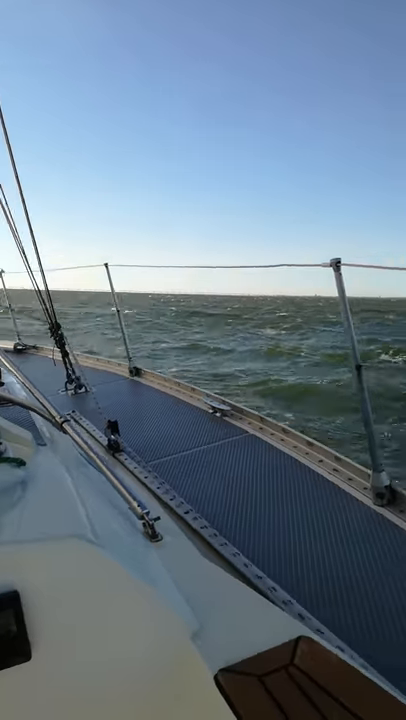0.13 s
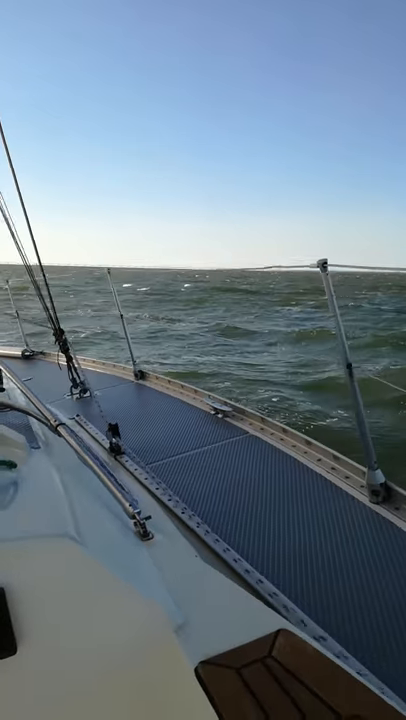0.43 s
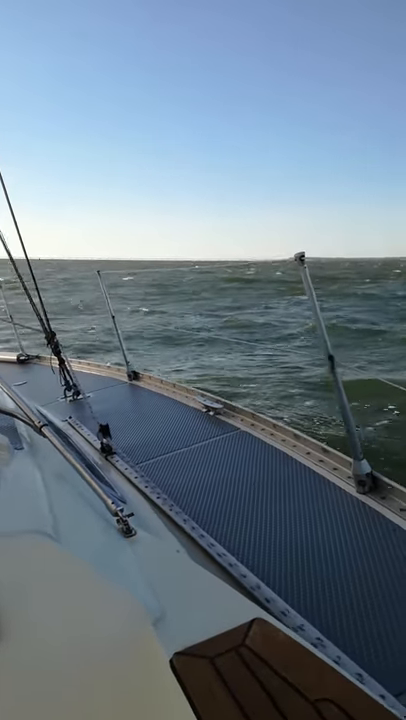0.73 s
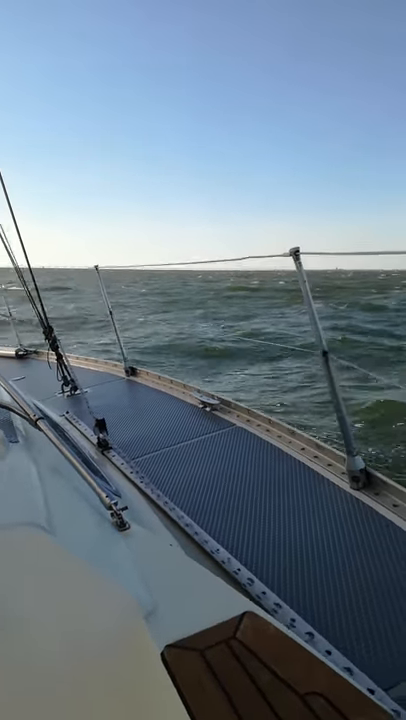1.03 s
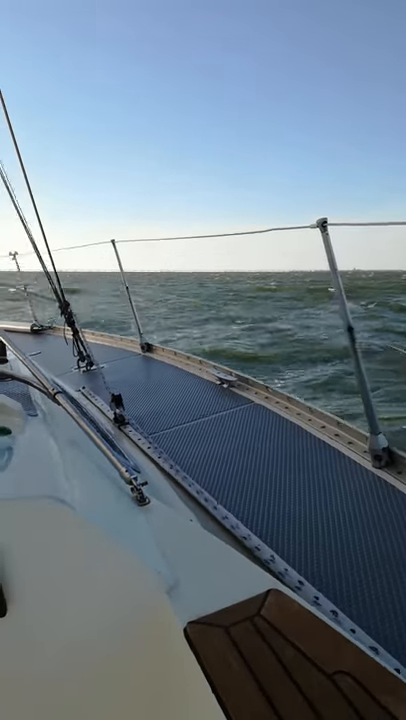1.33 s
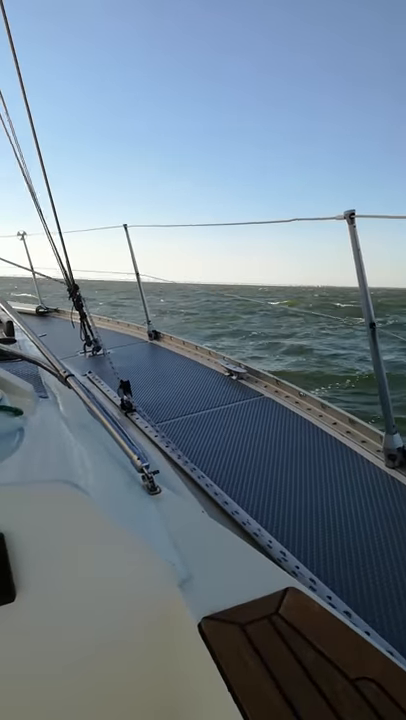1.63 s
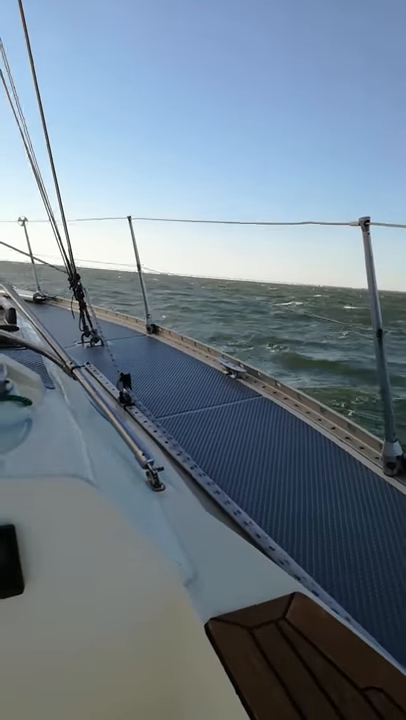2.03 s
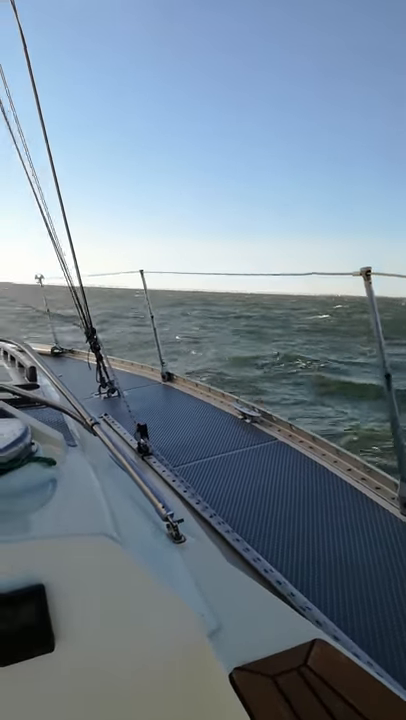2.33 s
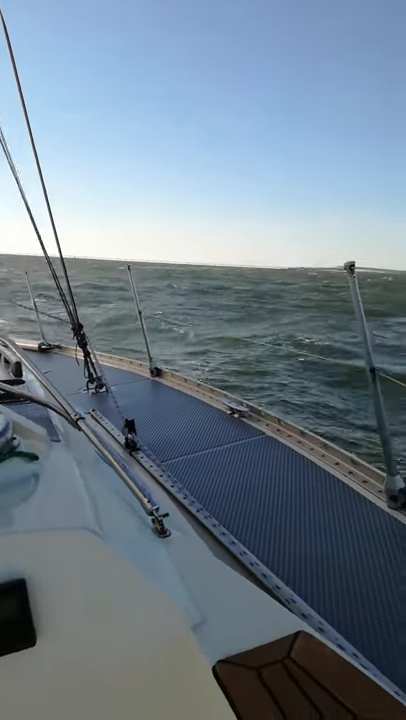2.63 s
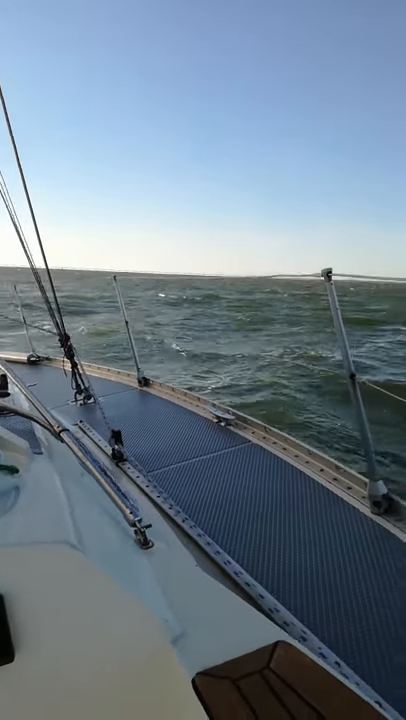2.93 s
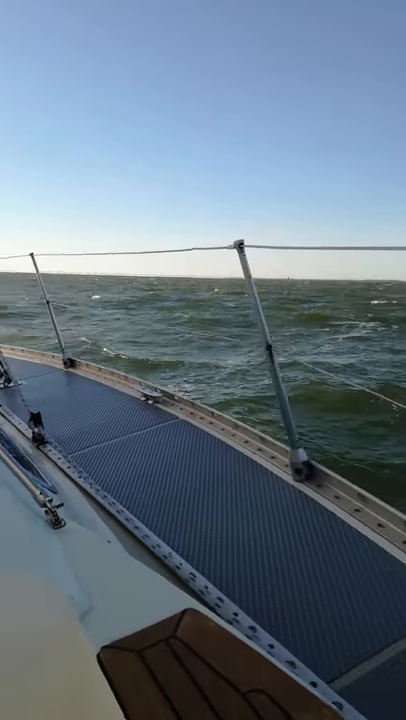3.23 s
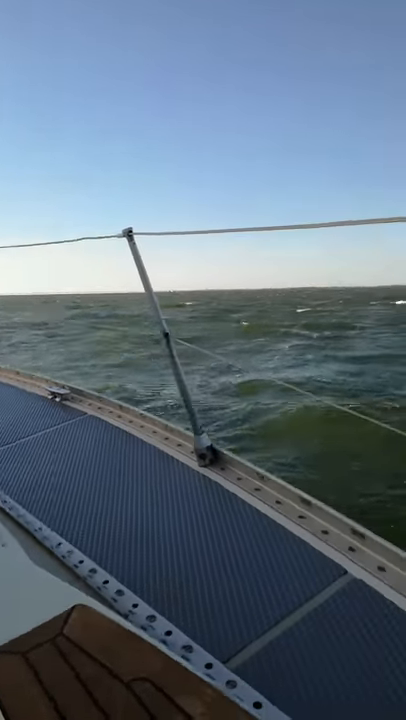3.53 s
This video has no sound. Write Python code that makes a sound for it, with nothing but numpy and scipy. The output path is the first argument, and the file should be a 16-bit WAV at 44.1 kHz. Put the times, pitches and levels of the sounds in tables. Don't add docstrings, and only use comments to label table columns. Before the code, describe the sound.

Fresh wind rumbles and thumps unevenly on a phone's two microphone ports aboard a sailing boat, building toward the end; far quieter, water hisses along the hull and a loose shackle clinks around the middle.

```python
import sys
import numpy as np
from scipy import signal
from scipy.fft import rfft, irfft, next_fast_len
from scipy.io import wavfile
from scipy.ndimage import uniform_filter1d

SR = 44100
rng = np.random.default_rng(int(sys.argv[2]) if len(sys.argv) > 2 else 0)


def persist_wave(psi):
    counts = np.round(np.clip(psi, -1, 1) * 32767).astype(np.int16)
    wavfile.write(sys.argv[1], SR, np.atleast_2d(counts).T)


def makeup_ratio(level_db):
    decades = np.asarray(level_db, float) / 20
    return 10 ** decades


N = 162288

# time of peak in seconds, strength in dB, length in seconds,
# brightness in dB.
LEFT_EDDIES = [(0.006, -30, 0.016, 4.5), (0.064, -27.5, 0.025, -3), (0.162, -22, 0.047, -3),
               (0.231, -21, 0.03, -13.5), (0.317, -28, 0.053, 7.5), (0.424, -17.5, 0.034, -11),
               (0.48, -22.5, 0.1, 3.5), (0.569, -19, 0.032, -8), (0.68, -24.5, 0.054, -5.5),
               (0.745, -25.5, 0.026, 5.0), (0.833, -17, 0.038, -4), (0.899, -19.5, 0.036, 8.5),
               (1.013, -15.5, 0.073, -2.5), (1.062, -28.5, 0.017, 18), (1.094, -19.5, 0.012, -1),
               (1.183, -16.0, 0.057, -4), (1.313, -16, 0.084, 2.5), (1.443, -14, 0.041, -4.5),
               (1.52, -23, 0.022, -9), (1.608, -17, 0.031, 1.5), (1.685, -17, 0.048, -15),
               (1.772, -19.5, 0.03, -4.5), (1.821, -23.5, 0.085, -5.5), (1.9, -17, 0.028, 1.5),
               (1.999, -20, 0.075, -13), (2.109, -17.5, 0.028, 1.5), (2.17, -15.5, 0.049, -4),
               (2.259, -20.5, 0.059, -7), (2.345, -14.5, 0.04, -7.5), (2.4, -17, 0.036, -2),
               (2.491, -14, 0.026, -10), (2.561, -18, 0.025, 7), (2.654, -21.5, 0.075, 0.0),
               (2.769, -18.0, 0.14, -6), (2.831, -25, 0.025, -12), (2.895, -23, 0.0097, 0.0),
               (2.955, -18.5, 0.031, 10), (3.008, -15.5, 0.04, -5.5), (3.059, -16, 0.026, 7),
               (3.175, -18, 0.057, 7), (3.264, -17.5, 0.038, 7.0), (3.331, -13.5, 0.021, -5),
               (3.388, -17.5, 0.027, 5.5), (3.491, -18, 0.069, 5), (3.6, -22.5, 0.036, 7.5),
               (3.658, -25.5, 0.011, 9.5)]
# time of peak in seconds, strength in dB, length in seconds,
# brightness in dB.
RIGHT_EDDIES = [(0, -46, 0.021, 22.0), (0.067, -19.5, 0.01, -13), (0.09, -30, 0.021, -4),
                (0.14, -25.0, 0.025, -2.0), (0.152, -33.0, 0.077, 23), (0.306, -18.5, 0.048, -7.5),
                (0.43, -24, 0.036, 14), (0.518, -26.5, 0.048, 17.0), (0.551, -17, 0.036, -5.5),
                (0.677, -19.5, 0.046, -12), (0.764, -14.5, 0.047, -3.5), (0.829, -32.5, 0.077, 20.5),
                (0.95, -35.5, 0.11, 15), (1.032, -30.5, 0.025, 9), (1.157, -39, 0.095, -13),
                (1.222, -29, 0.14, 21), (1.3, -24, 0.031, 18.5), (1.44, -20.0, 0.042, 8.5),
                (1.54, -24, 0.05, 11.5), (1.626, -29.5, 0.03, 18), (1.681, -22, 0.023, 8.5),
                (1.747, -25.5, 0.051, 18.5), (1.861, -17.5, 0.017, -3.5), (1.902, -20, 0.041, -2.5),
                (1.96, -32.5, 0.028, 22.0), (2.032, -31, 0.07, 21), (2.087, -21.5, 0.025, 19),
                (2.186, -26, 0.064, 18.5), (2.264, -26, 0.02, 10), (2.395, -22.5, 0.11, 13),
                (2.516, -11.5, 0.027, 8), (2.62, -23, 0.039, -16), (2.665, -17.5, 0.022, -3.5),
                (2.784, -26, 0.087, 16), (2.922, -17, 0.058, 1.0), (3.044, -14, 0.012, -4),
                (3.063, -24.5, 0.11, 3), (3.145, -10.5, 0.0066, -17), (3.175, -16, 0.019, -13),
                (3.241, -14, 0.037, -14), (3.247, -22.5, 0.11, 27), (3.369, -16.5, 0.04, -4.0),
                (3.456, -20, 0.054, -1), (3.522, -11.5, 0.023, -22), (3.592, -19, 0.15, -18),
                (3.707, -6, 0.034, -12.5)]
# time of peak in seconds,
# strength in dB, length in seconds, brightness in dB.
GUST_LEAD_INS = [
    (2.058, -26, .035, 24),
    (2.465, -25, .025, 22),
]
# frequency in Hz, level in dB per Hz.
WIND_COLOUR = [(25, -13), (60, -4.5), (120, 1), (280, -1), (600, -8), (1200, -20.5), (2200, -39),
               (6000, -65)]
# time in seconds, level in dB, spray brightness in dB.
HULL_WASH = [(0, -67.5, -12.5), (.3, -67, -17), (.55, -63.5, -14.5), (.75, -56.5, -18), (.95, -62.5, -12),
             (1.22, -57, -19), (1.55, -62, -14.5), (1.9, -64.5, -17), (2.2, -65.5, -13), (2.45, -60, -22),
             (2.65, -64, -13.5), (2.9, -53.5, -12.5), (3.05, -57, -13.5), (3.2, -56.5, -12.5),
             (3.4, -60, -15.5), (3.68, -64, -15)]
# frequency in Hz, level in dB per Hz.
SEA_COLOUR = [(600, -5.5), (1500, -5), (3300, -2.5), (5200, -7), (7000, -15), (10000, -20.5), (13000, -20),
              (16000, -25)]
# frequency in Hz, left minus right in dB.
PORT_DIFFERENCE = [(1500, -11.5), (3000, -2.5), (5200, -4), (7200, 3), (10000, 5.5), (15000, 4)]
# start in seconds, peak in dB, port (0 left, 1 right), pitch in Hz.
WIND_PUFFS = [(.0625, -21, 1, 520), (.0935, -24, 1, 520), (.2775, -12, 1, 330), (.7425, -11, 1, 380),
              (1.001, -11, 0, 560), (2.899, -13, 1, 520), (2.926, -14, 1, 520), (3.1398, -11, 1, 240),
              (2.513, -16, 1, 520), (3.172, -13, 0, 520), (3.398, -16, 0, 520), (1.262, -16, 0, 520),
              (1.326, -15, 0, 520), (2.961, -16, 0, 520), (3.5245, -11, 1, 230), (3.258, -12, 1, 260),
              (.1285, -17, 1, 260)]
# start in seconds, peak in dB, left minus right in dB,
# share of ping from 0 to 1, rattle length in seconds.
SHACKLE_TOUCHES = [
    (0.163, -45.5, 1.5, 0.05, 0.055),
    (1.376, -31.5, 2, 0.25, 0.011),
    (1.749, -30.5, -1.5, 0.24, 0.019),
    (2.2755, -35.5, 2, 0.4, 0.0066),
    (2.325, -34, 1, 0.4, 0.007),
    (2.3335, -43, 1.5, .02, .006),
    (2.373, -30.5, -1.5, 0.34, .012),
    (2.384, -39, 0.5, .02, .014),
    (3.403, -46.5, -4, 0, 0.0054),
]
# frequency in Hz, width in Hz, level in dB.
SHACKLE_RESONANCES = [(2900, 1000, 0.0), (5100, 1400, -1.0), (7000, 1500, -9), (10500, 2500, -18),
                      (13000, 2500, -20)]
# time of peak in seconds, pitch in Hz, peak in dB,
# length in seconds.
LEFT_THROBS = [(.41, 166, -19, 0.031), (1.46, 314.6, -23, .035), (2.34, 253.8, -22, 0.049),
               (2.49, 210.4, -27, .035), (.442, 147, -19.5, 0.04), (1.06, 108.3, -25.5, 0.2),
               (1.227, 135.6, -24.5, 0.054), (1.43, 97.8, -20, 0.082), (1.68, 124.6, -21.5, 0.066),
               (2.181, 154.5, -20, 0.06), (2.41, 130, -19.5, 0.055), (2.952, 253, -25.5, .07)]
# time of peak in seconds, pitch in Hz, peak in dB,
# length in seconds.
RIGHT_THROBS = [
    (0.287, 200, -26.5, 0.023),
    (3.637, 220, -18.5, 0.019),
    (3.361, 240, -22, 0.071),
    (0.78, 219, -27.5, 0.12),
    (2.512, 287, -16, 0.032),
    (3.171, 150, -20.5, 0.055),
    (2.7, 110, -22, 0.04),
    (3.524, 52, -25, 0.043),
    (3.525, 219, -25, 0.15),
]

BUFFET_DB, BUFFET_TOP_HZ = -4.5, 4800
CALM_DB, EDDY_WIDTH, EDDY_TAIL = -37, 0.63, 0.8
BRIGHT_FROM_HZ, BRIGHT_FULL_HZ, BRIGHT_SHARE = 327, 1930, 0.92
LUMP_DB, LUMPS_PER_S, FLUTTER_DB, FLUTTERS_PER_S = 2.5, 62, 1.46, 14.7
STEADY_S, STEADY_CYCLES, STEADY_SHARE = 0.03, 3.5, 0.85
SEA_DB, SEA_PATCHY_DB, SEA_TOGETHER = 6, 1.43, 0.8
SPRAY_FROM_HZ, SPRAY_FULL_HZ = 9100, 10100
DROPS_PER_S, DROP_SPREAD_DB, DROP_SHARE = 5500, 2.5, 0.13
PUFF_CYCLES = 0.7
PING_HZ, PING_DELAY_S, PING_S = 4090, 0.0035, 0.0025
CRACK_HZ, CRACK_DB, HIGHS_FADE, DULL_HZ = 4700, 2.5, 0.45, 5000
CLINK_TAIL_DB, CLINK_TAIL_S = -8.0, 0.024
BLEND, BLEND_CUT_HZ, BLEND_LAG_S = 0.97, 322, 0.00053


def rms_one(x):
    return x / np.sqrt(np.mean(x ** 2) + 1e-20)


def at_hz(points, hz):
    points = np.array(points)
    return np.interp(np.log(hz), np.log(points[:, 0]), points[:, 1])


def ramp(hz, low_hz, high_hz):
    return np.clip(np.log(hz / low_hz) / np.log(high_hz / low_hz), 0, 1)


def drift(rate):
    r = np.exp(-80 * np.pi * rate / SR)
    white = rng.standard_normal((2, N // 40 + 1002))
    slow = signal.lfilter([1], [1, -2 * r, r * r], white)[:, 1000:]
    t = np.arange(N) / 40
    return np.array([np.interp(t, np.arange(len(v)), rms_one(v)) for v in slow])


def bands(white, low_hz, count):
    edges = np.minimum(low_hz * 2 ** (np.arange(count + 1) / 2), 0.45 * SR)
    run_in = np.concatenate([white[..., -SR // 5:], white], axis=-1)
    for k in range(count):
        sos = signal.butter(2, edges[k:k + 2], "band", fs=SR, output="sos")
        yield np.sqrt(edges[k] * edges[k + 1]), signal.sosfilt(sos, run_in[k % 2])[:, -N:]


def eddies(rows):
    s, db, length, bright_db = np.array(rows, float).T[:, :, None]
    t = np.arange(0, N + 64, 64) / SR
    distance = (t - s) / (EDDY_WIDTH * length)
    power = makeup_ratio(2 * db) / (1 + distance ** 4) ** EDDY_TAIL
    total = power.sum(axis=0) + makeup_ratio(2 * CALM_DB)
    level_db = 10 * np.log10(total)
    brightness_db = (power * bright_db).sum(axis=0) / total
    return [np.interp(np.arange(N) / SR, t, v) for v in (level_db, brightness_db)]


def buffeting():
    left = eddies(LEFT_EDDIES)
    right = eddies(list(RIGHT_EDDIES) + list(GUST_LEAD_INS))
    level_db, bright_db = np.transpose([left, right], (1, 0, 2))
    out, norm, lumps = 0, 0, drift(LUMPS_PER_S)
    for hz, band in bands(rng.standard_normal((2, 2, N)), low_hz=21.36, count=16):
        db = at_hz(WIND_COLOUR, hz)
        norm += makeup_ratio(2 * db) * np.mean(band ** 2)
        band = band * makeup_ratio(LUMP_DB * lumps + FLUTTER_DB * drift(FLUTTERS_PER_S))
        span = int((STEADY_S + STEADY_CYCLES / hz) * SR)
        power = uniform_filter1d(uniform_filter1d(band ** 2, span), span) / np.mean(band ** 2)
        steady = band / (power + 1e-3) ** (STEADY_SHARE / 2)
        tilt_db = BRIGHT_SHARE * ramp(hz, BRIGHT_FROM_HZ, BRIGHT_FULL_HZ) * bright_db
        out = out + steady * makeup_ratio(db + tilt_db)
    wind = makeup_ratio(BUFFET_DB + level_db) * out / np.sqrt(norm)
    return signal.sosfilt(signal.butter(2, BUFFET_TOP_HZ, fs=SR, output="sos"), wind)


def sea():
    s, db, spray_db = np.transpose(HULL_WASH)
    t = np.arange(N) / SR
    level_db = np.interp(t, s, db)
    spray_db = np.interp(t, s, spray_db - np.median(spray_db))
    shape = (2, 2, N)
    lands = rng.random(shape) < DROPS_PER_S / SR
    sign = rng.choice([-1, 1], shape)
    size_db = DROP_SPREAD_DB * np.minimum(rng.exponential(1, shape), 5)
    drops = rms_one(lands * sign * makeup_ratio(size_db))
    white = np.sqrt(DROP_SHARE) * drops + np.sqrt(1 - DROP_SHARE) * rng.standard_normal(shape)
    out, norm, together = 0, 0, drift(16.0).mean(axis=0)
    for hz, band in bands(white, low_hz=540, count=11):
        db = at_hz(SEA_COLOUR, hz)
        norm += makeup_ratio(2 * db) * np.mean(band ** 2)
        side_db = at_hz(PORT_DIFFERENCE, hz) / 2 * np.array([[1], [-1]])
        top_db = ramp(hz, SPRAY_FROM_HZ, SPRAY_FULL_HZ) * spray_db
        patchy_db = SEA_PATCHY_DB * (SEA_TOGETHER * together + drift(11.0))
        out = out + band * makeup_ratio(db + side_db + top_db + patchy_db)
    return makeup_ratio(SEA_DB + level_db) * out / np.sqrt(norm)


def puffs():
    t, out = np.arange(SR // 40) / SR, np.zeros((2, N + SR))
    for s, db, port, hz in WIND_PUFFS:
        x = t * hz / PUFF_CYCLES
        swell = x ** 2 * np.exp(2 - 2 * x)
        start = int(s * SR)
        out[int(port), start:start + len(t)] -= makeup_ratio(db) * swell * np.sin(2 * np.pi * hz * t)
    return out[:, :N]


def shackle_fade(t, length, pace):
    tail = makeup_ratio(CLINK_TAIL_DB) * np.exp(-pace * t / CLINK_TAIL_S)
    return np.exp(-(pace * t / length) ** 3) + tail


def shackle():
    out, t = np.zeros((2, N + SR)), np.arange(SR // 8) / SR
    ping = np.exp(-((t - PING_DELAY_S) / PING_S) ** 2) * np.sin(2 * np.pi * PING_HZ * t)
    sides = np.array([[0.5], [-0.5]])
    crack_filter = signal.butter(2, [1800, CRACK_HZ], "band", fs=SR, output="sos")
    dull_filter = signal.butter(1, DULL_HZ, fs=SR, output="sos")
    for s, db, pan_db, share, length in SHACKLE_TOUCHES:
        noise = rng.standard_normal((len(SHACKLE_RESONANCES) + 1, 3, len(t)))
        rattle = np.minimum(t / 0.0015, 1) * (noise[:, 2:] + 1.2 * noise[:, :2])
        crack = rattle[-1] * shackle_fade(t, length, 0.81)
        body = makeup_ratio(CRACK_DB) * signal.sosfilt(crack_filter, crack)
        for k, (hz, width_hz, level_db) in enumerate(SHACKLE_RESONANCES):
            r = np.exp(-np.pi * width_hz / SR)
            pace = max(hz / CRACK_HZ, 1) ** HIGHS_FADE
            poles = [1, -2 * r * np.cos(2 * np.pi * hz / SR), r * r]
            struck = rattle[k] * shackle_fade(t, length, pace)
            ring = signal.lfilter([1 - r * r, 0, r * r - 1], poles, struck)
            body = body + makeup_ratio(level_db + at_hz(PORT_DIFFERENCE, hz) * sides) * ring
        body = signal.sosfilt(dull_filter, body)
        hit = share * ping + (1 - share) * body / np.abs(body).max()
        start = int(s * SR)
        out[:, start:start + len(t)] += makeup_ratio(db + pan_db * sides) * hit
    return out[:, :N]


def throbs():
    t, waver, out = np.arange(N) / SR, drift(12.6), np.zeros((2, N))
    for port, rows in enumerate((LEFT_THROBS, RIGHT_THROBS)):
        for s, hz, db, length in rows:
            swell = np.exp(-2.8 * ((t - s) / length) ** 2)
            phase = 2 * np.pi * (hz * t + rng.random()) + 0.5 * waver[port]
            out[port] += makeup_ratio(db) * swell * np.sin(phase)
    return out


def scene():
    return buffeting() + sea() + puffs() + shackle() + throbs()


def low_pass(x):
    return signal.sosfilt(signal.butter(12, 15830, fs=SR, output="sos"), x)


def record(dry):
    size = next_fast_len(N + 4096)
    hz = np.arange(size // 2 + 1) * SR / size
    late = np.exp(-2j * np.pi * hz * BLEND_LAG_S)
    cross = BLEND * late / (1 + 1j * hz / BLEND_CUT_HZ)
    other_port = irfft(rfft(dry[::-1], size) * cross, size)[:, :N]
    return low_pass(dry + other_port)


dry = scene()
out = record(dry)
persist_wave(out)
```